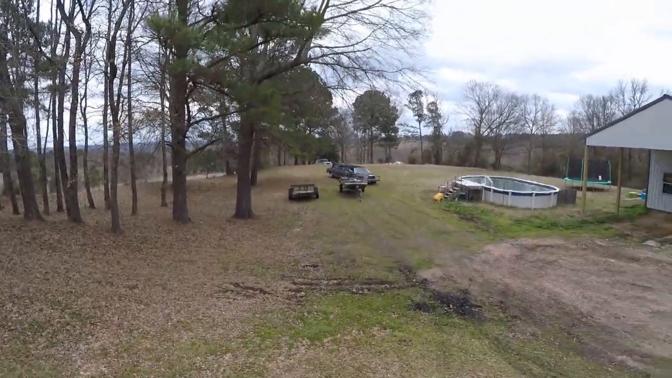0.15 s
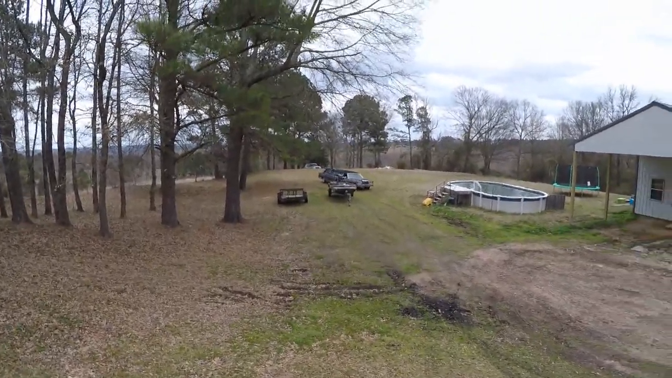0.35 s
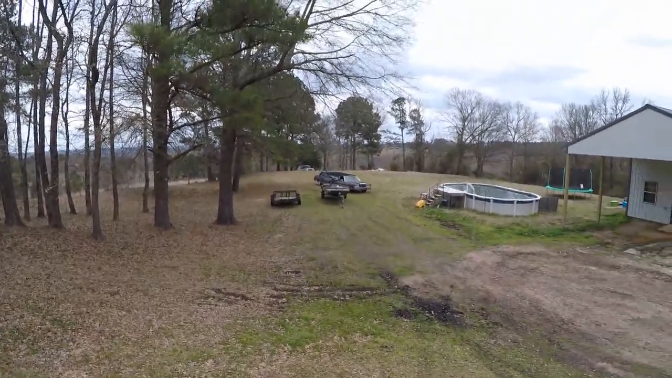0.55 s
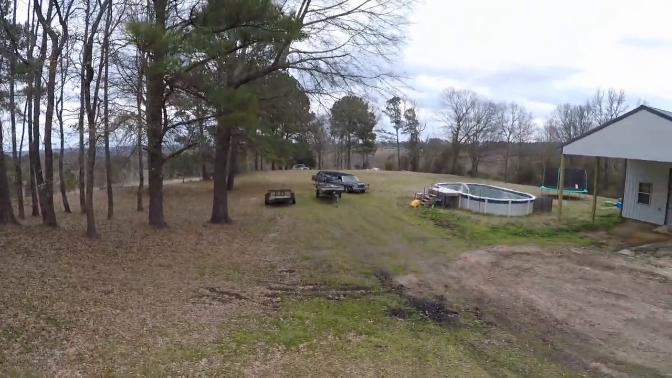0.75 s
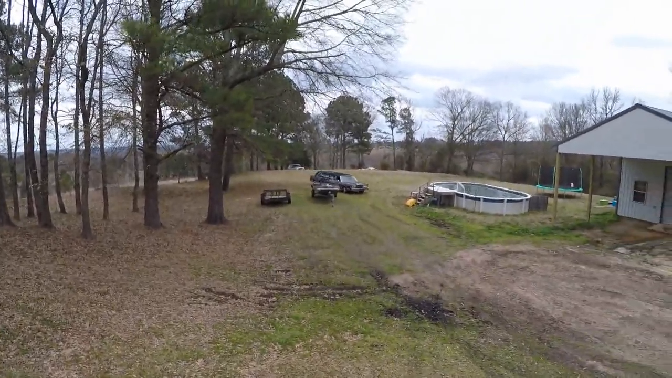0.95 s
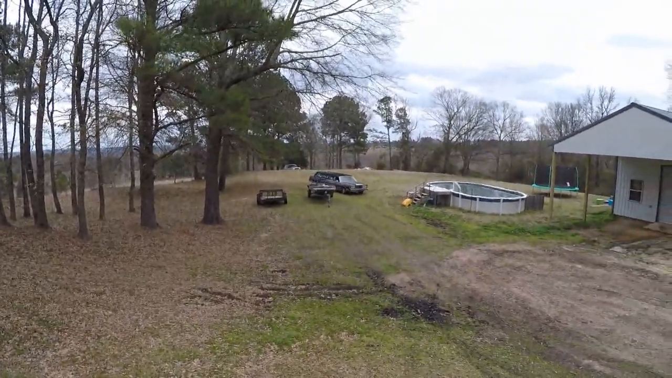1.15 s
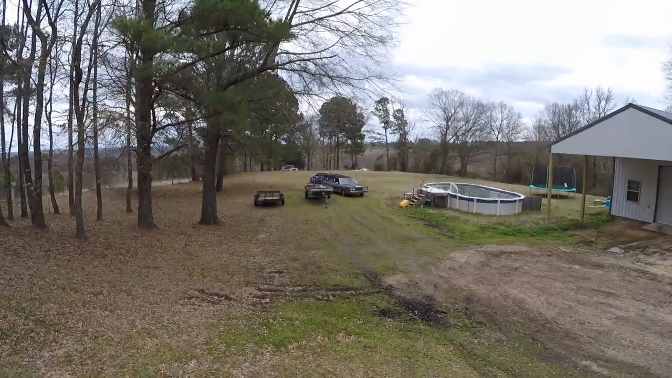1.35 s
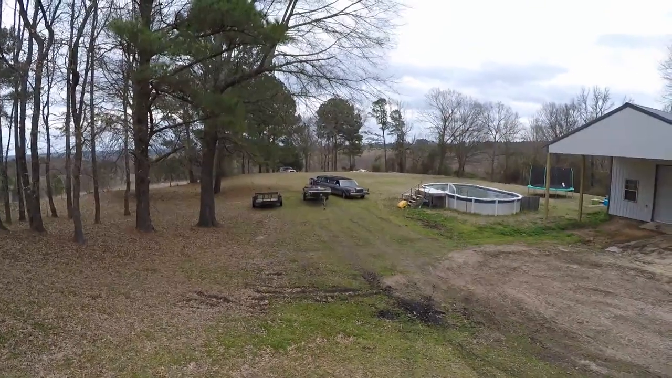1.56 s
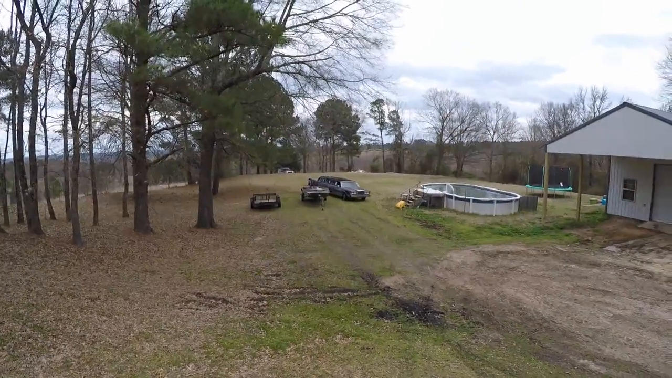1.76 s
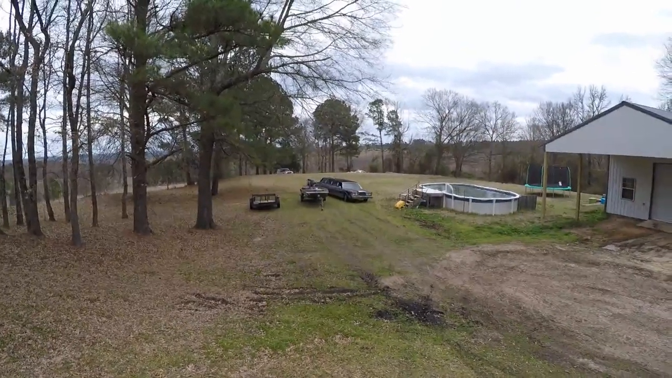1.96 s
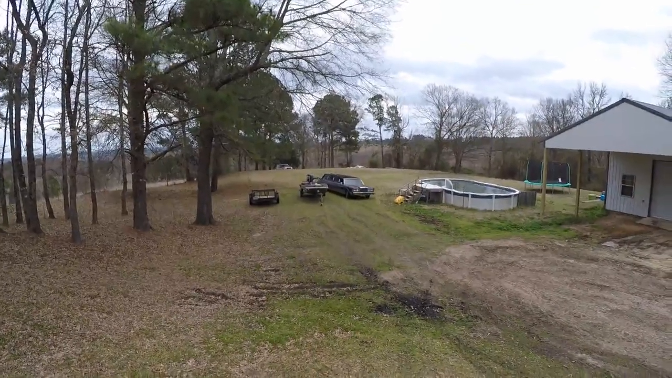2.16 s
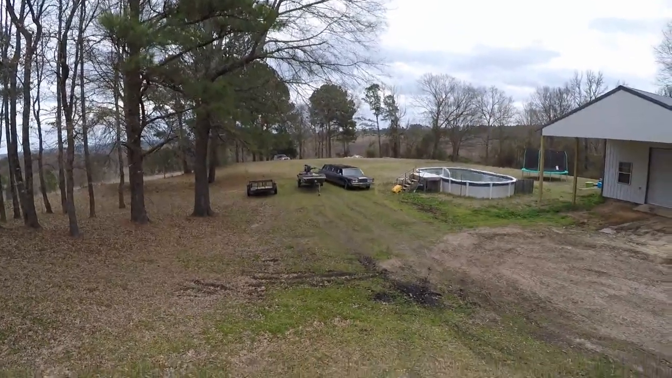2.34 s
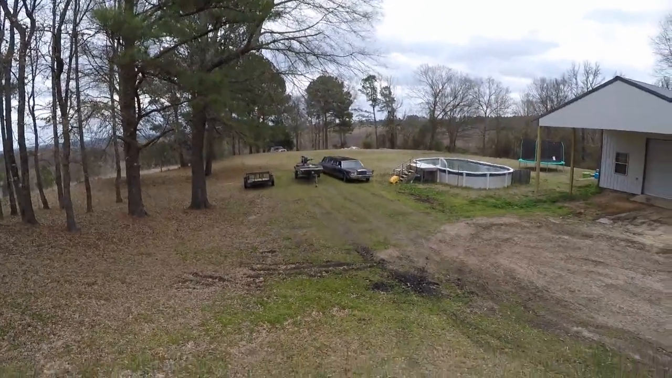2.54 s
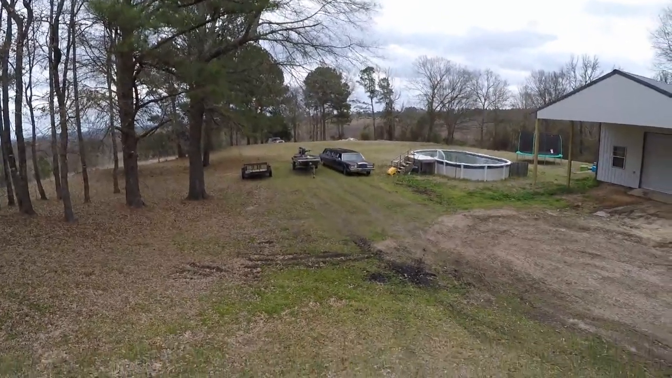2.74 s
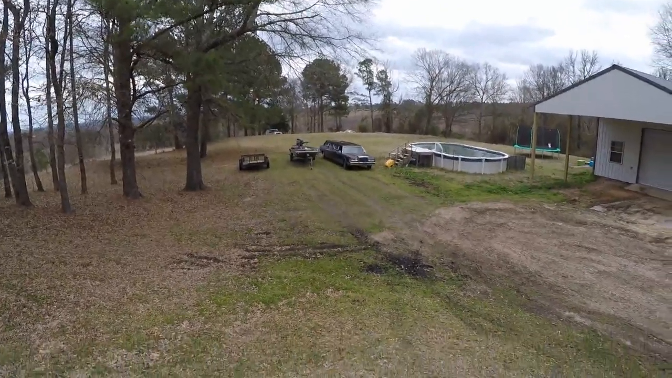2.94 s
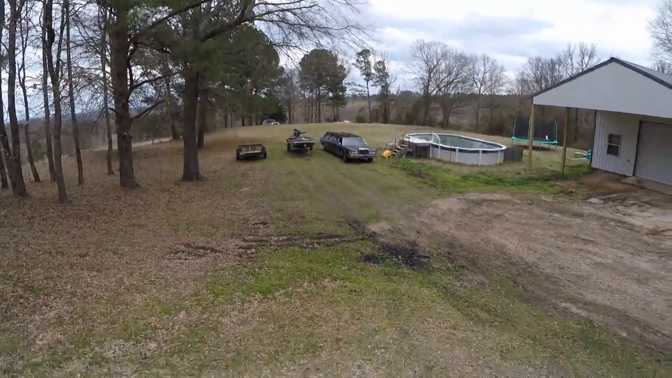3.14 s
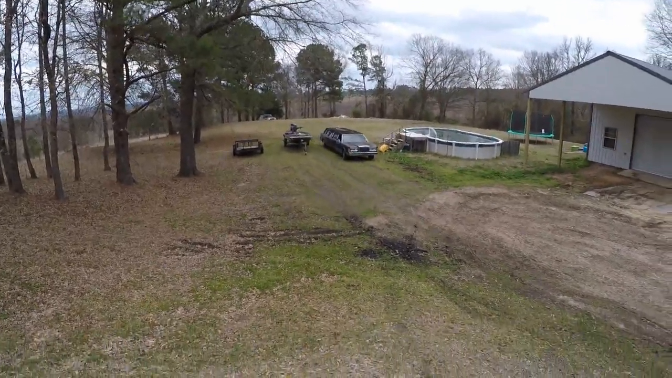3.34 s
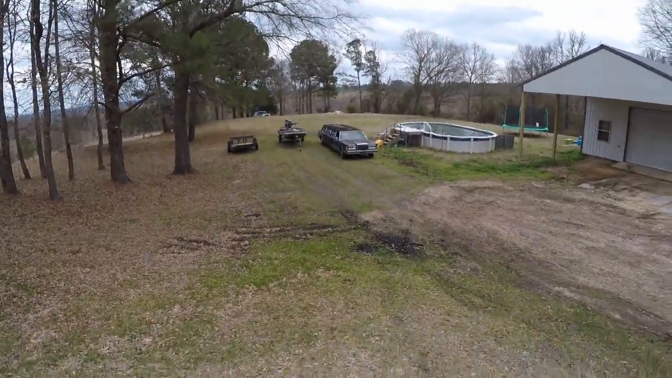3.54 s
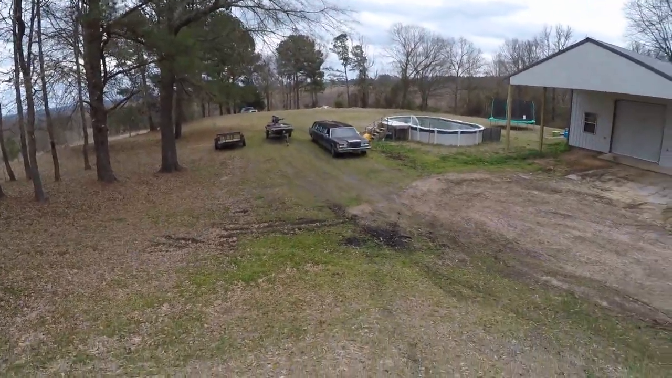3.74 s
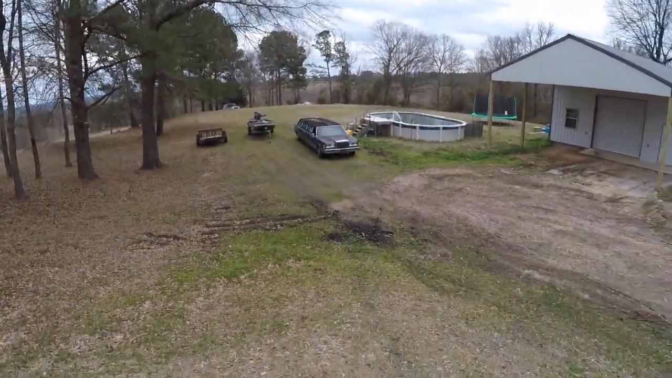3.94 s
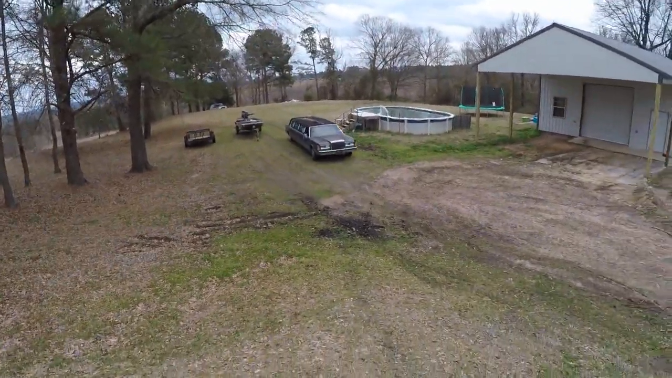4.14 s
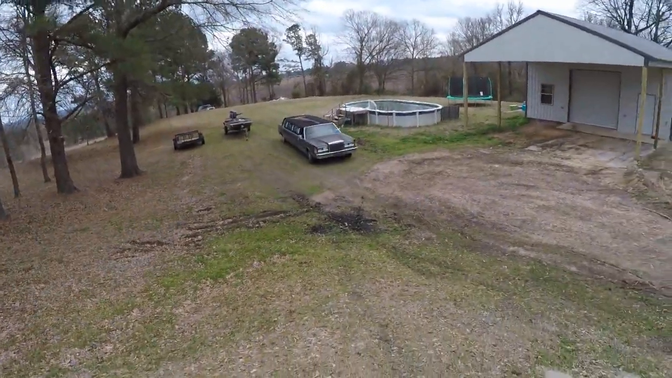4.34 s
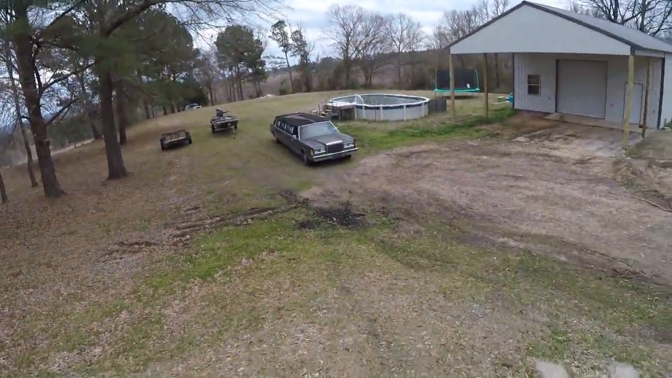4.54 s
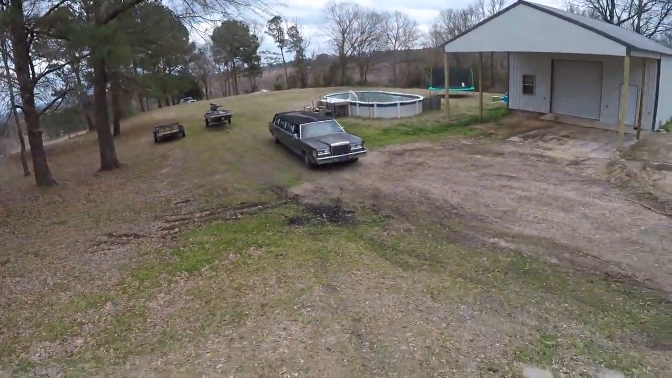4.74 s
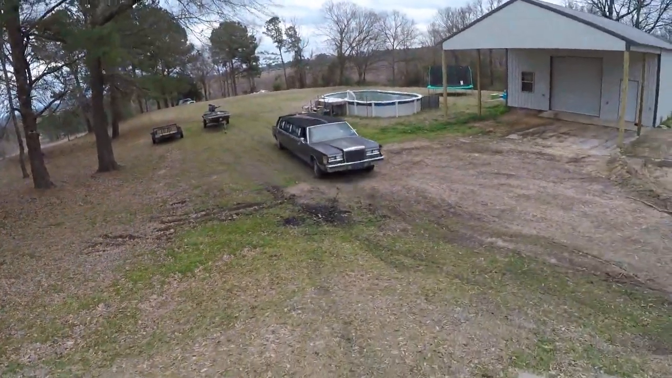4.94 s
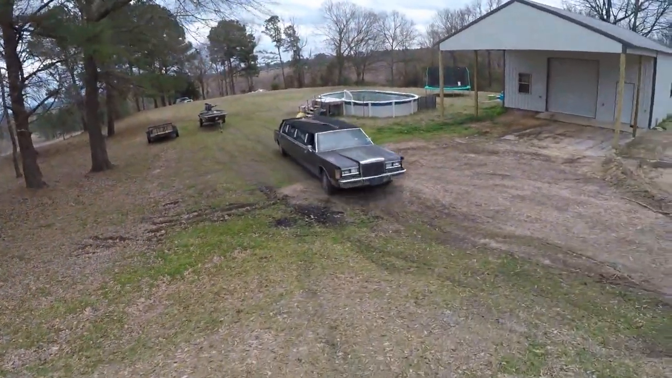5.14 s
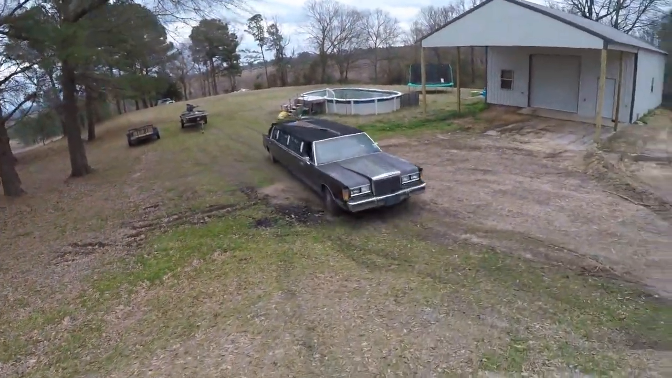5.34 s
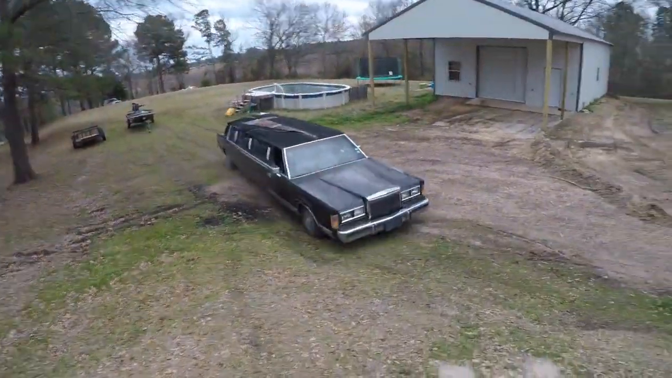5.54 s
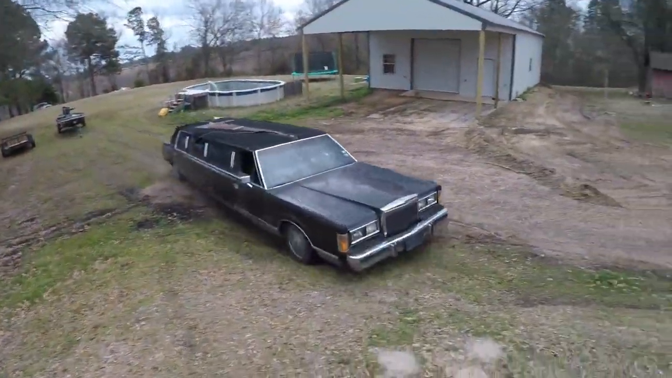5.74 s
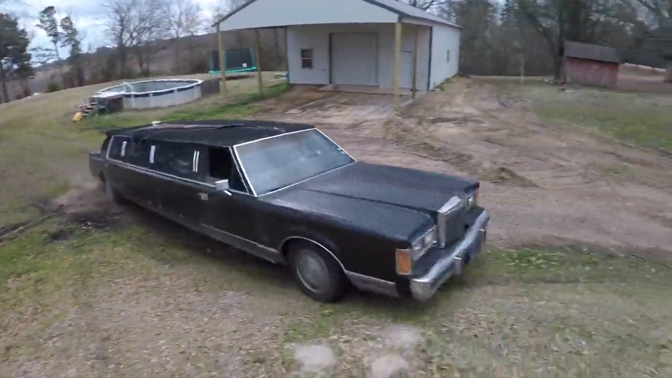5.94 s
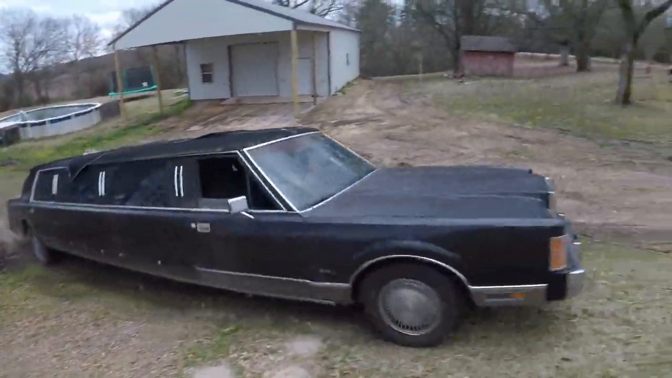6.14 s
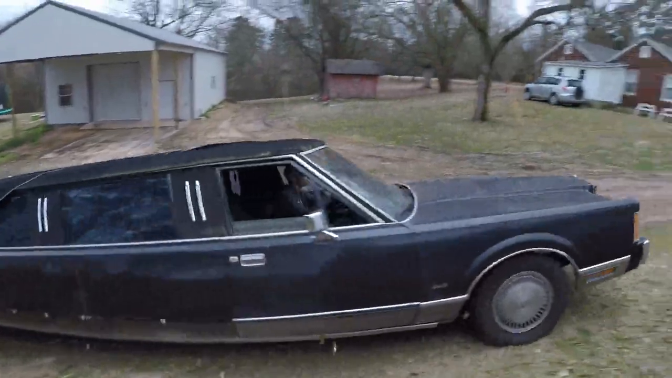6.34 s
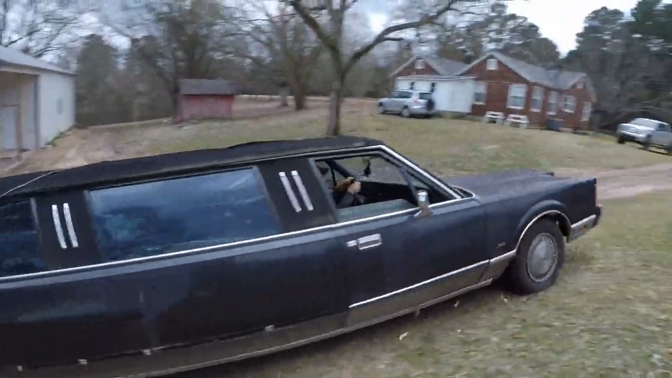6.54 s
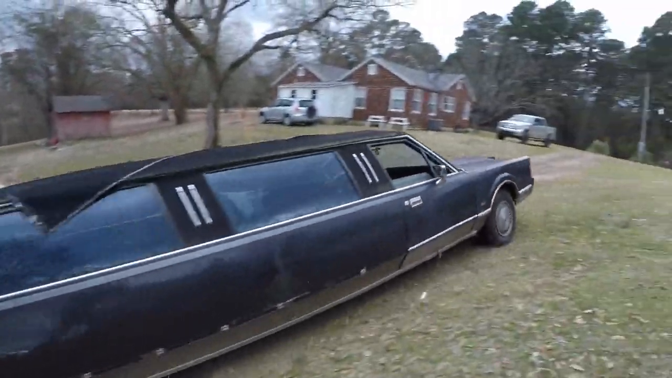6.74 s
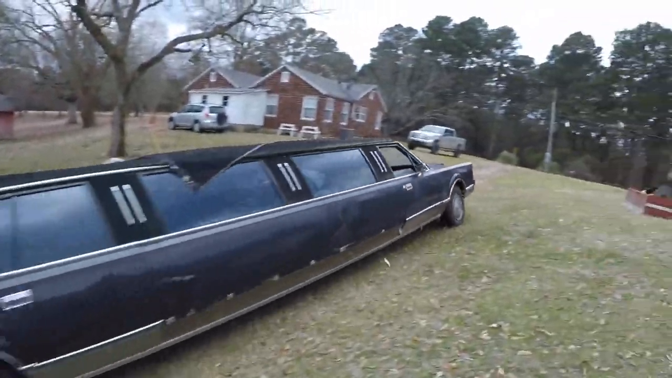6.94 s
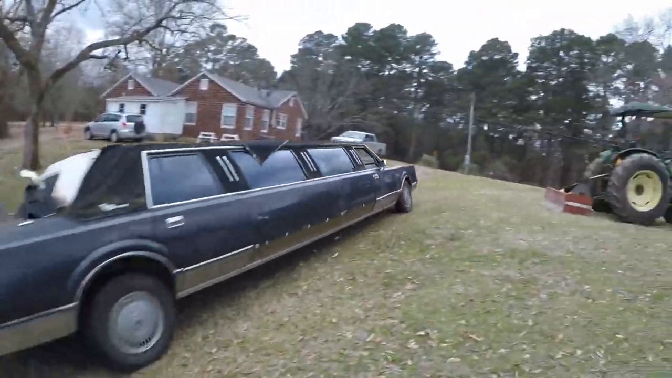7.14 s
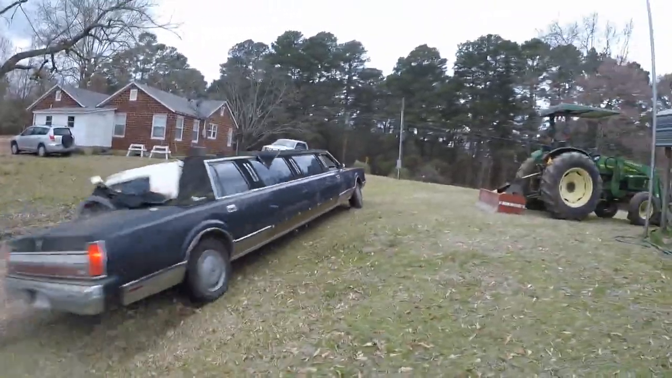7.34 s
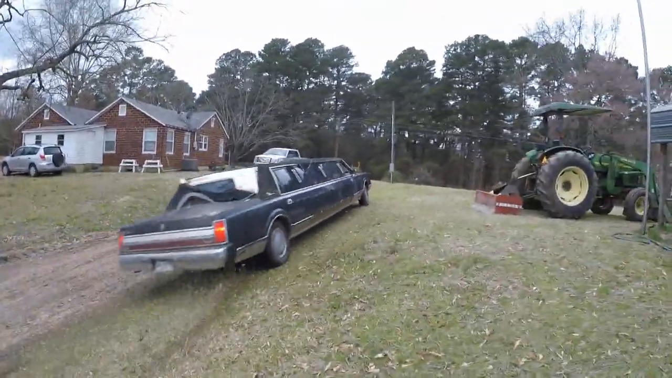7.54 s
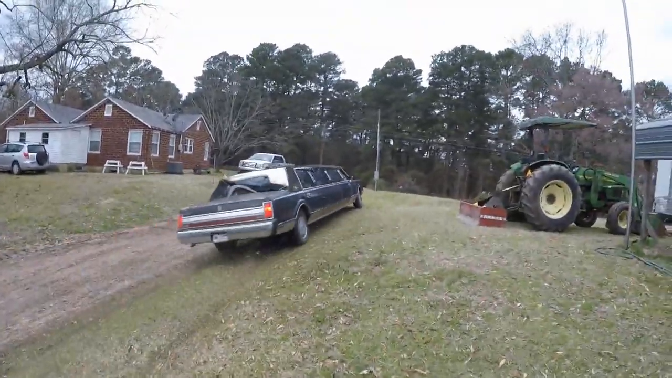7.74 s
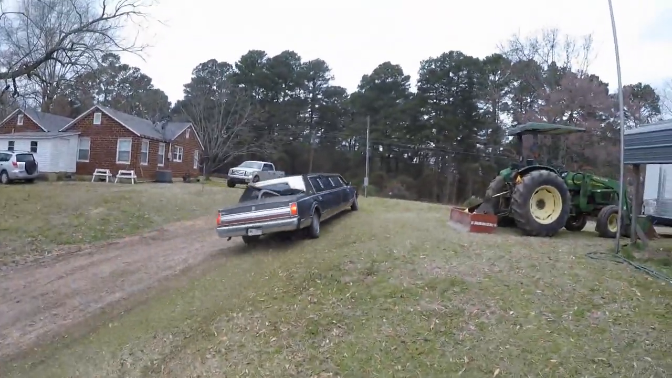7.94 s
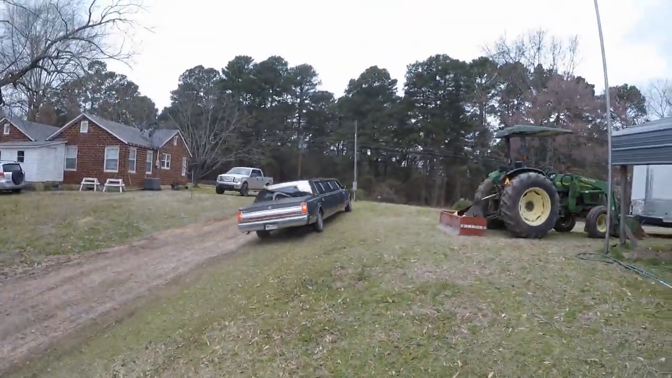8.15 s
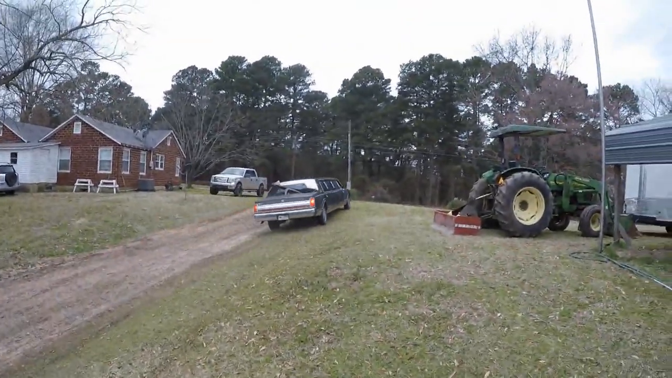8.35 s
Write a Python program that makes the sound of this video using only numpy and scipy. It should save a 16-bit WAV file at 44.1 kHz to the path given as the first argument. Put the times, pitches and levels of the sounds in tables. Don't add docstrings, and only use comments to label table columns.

```python
import sys
import numpy as np
from scipy import signal
from scipy.fft import rfft, irfft, next_fast_len
from scipy.io import wavfile
from scipy.ndimage import uniform_filter1d

SR = 44100
rng = np.random.default_rng(int(sys.argv[2]) if len(sys.argv) > 2 else 0)


def unload_audio(sound):
    columns = np.transpose(np.atleast_2d(sound))
    steps = np.round(np.clip(columns, -1, 1) * 32767)
    wavfile.write(sys.argv[1], SR, steps.astype(np.int16))


def gain_from_db(level_db):
    decades = np.asarray(level_db, float) / 20
    return 10 ** decades


N = 369999
T = np.arange(N) / SR

# time in seconds, firings per second in Hz.
FIRING_RATE = [(0.0, 48.8), (0.51, 70.16), (1.4, 89.75), (2.0, 98.8), (2.7, 116.4), (3.08, 126.7),
               (3.69, 136), (4.98, 150.5), (5.42, 154.1), (5.445, 154.8), (5.8, 164.8), (6.05, 168.2),
               (6.2, 191.4), (6.48, 190), (6.76, 216.7), (7.04, 187.4), (7.3, 191.6)]
# time in seconds, exhaust level in dB,
# lift of the firing tones over the other tones in dB, gas noise level in dB.
THROTTLE = [(0.0, -35, 2, -58.5), (0.51, -27, 1, -52.5), (1.4, -28.5, 10, -50), (2.0, -22, 8, -46),
            (2.7, -22, 3.5, -40), (3.0, -18.5, -0.5, -37.5), (3.69, -18, 5.5, -31.5),
            (4.35, -13.5, -3.5, -29.5), (4.6, -16.5, 3, -30.5), (4.98, -15, 1.5, -28.5),
            (5.42, -14.5, 4, -24.5), (5.445, -18, 2.5, -30), (5.8, -16.5, 5.5, -27), (6.05, -15, 8, -23.5),
            (6.16, -13.5, 7, -21), (6.24, -14, -3.5, -21.5), (6.48, -11.5, -3, -25.5),
            (6.65, -13, 3, -24.5), (6.8, -12.5, 1, -26), (6.9, -11, 1.5, -31), (7.04, -9.5, -3.5, -36),
            (7.3, -15, 1.5, -36.5)]
# multiple of the engine cycle rate, level in dB.
NOSE_TONES = [(1, -34), (2, -7.5), (3, -5.5), (4, -5.5), (5, 1), (6, -4), (7, -5), (8, 1.5), (9, -8.5),
              (10, -6), (11, -11.5), (12, -13), (13, -26), (14, -45), (15, -26.5), (16, -22), (17, -17.5),
              (18, -44), (19, -22.5), (20, -57), (21, -43), (22, -32), (23, -51), (24, -36)]
# multiple of the engine cycle rate, level in dB.
TAIL_TONES = [(1, -31), (2, -10.5), (3, -3), (4, 2.5), (5, -3.5), (6, -2), (7, -4.5), (8, -1), (9, -10.5),
              (10, -18.5), (11, -12), (12, -14.5), (13, -12.5), (14, -17.5), (15, -16), (16, -14.5),
              (17, -16), (18, -18), (19, -29), (20, -17.5), (21, -24), (22, -26), (23, -36), (24, -33.5),
              (25, -35.5), (26, -36)]
CYLINDER_PUFFS = [0, -8, -13, -11, -6, -12, -15, -13]
# time in seconds, length of turn in seconds,
# added share of tail pipe from 0 to 1.
TURNS = [
    (5.5, .2, .15),
    (6.15, .06, .85),
]
# time in seconds, half length in seconds,
# level in dB, pitch in Hz.
PANEL_BOOMS = [
    (5.795, 0.33, 1, 92.7),
    (5.913, 0.49, 1.5, 73),
    (6.274, 0.21, 0.5, 129.6),
    (6.36, 0.22, -1.5, 262),
    (6.457, 0.11, 0, 171.5),
    (6.712, 0.23, -3.5, 326),
    (7.177, 0.12, -5.5, 323),
    (4.58, 0.046, 3, 148),
]
# frequency in Hz, gain in dB.
MUFFLER = [(25, -10), (60, -2), (100, 0), (200, 0), (260, -2), (600, -1)]
# time in seconds, half length in seconds,
# share removed, low edge in Hz, high edge in Hz.
FLANK_SHADE = (5.91, 0.25, 1.1, 234, 300)
# frequency in Hz, level per Hz in dB.
GAS_TONE = [(300, -2), (450, 3), (700, -6.5), (1400, -5.5), (1900, -4.5), (2300, -12.5), (2900, -14.5),
            (3800, -9.5), (4700, -14), (6200, -12), (7500, -19), (8300, -25.5), (11300, -38), (13200, -51),
            (15000, -65)]
# frequency in Hz, gain against the middle in dB.
SIDE_TONE = [(300, 0), (1300, 2.5), (2100, -4), (2600, -4), (4200, -13), (5500, -6.5), (9000, -10.5),
             (12000, -1), (15000, -8)]
# time in seconds, half length in seconds, swell in dB.
LEAK_SWELL = [
    (6.2, 0.34, 4),
]
# time in seconds, half length in seconds, swell in dB.
INTAKE_SWELLS = [
    (5.2, 0.23, 16),
    (6.15, 0.099, 11),
    (6.42, 0.14, 8.5),
    (6.62, 0.26, 9),
    (6.8, 0.11, 9.5),
]
# pitch in Hz, width in Hz, level in dB.
PIPE_RINGS = [(2520, 250, -13), (3800, 390, -8.5), (6060, 600, -20)]
# time in seconds, half length in seconds,
# share removed, low edge in Hz, high edge in Hz.
LAWN_ECHO_DIP = (6.2, 0.29, 0.35, 2920, 3800)
# time in seconds, level in dB.
BREEZE = [(0, -46), (.8, -54.5), (1.2, -32.5), (2.1, -42.5), (2.5, -37.5), (3.5, -39), (4.5, -32),
          (5.5, -18.5), (5.9, -61), (6.2, -81), (7.62, -80), (7.7, -69), (8.0, -41), (8.39, -29)]
# time in seconds, half length in seconds, swell in dB.
GUSTS = [(0.0, 0.031, -4), (1.02, 0.031, 8), (1.2, 0.037, -4), (1.42, 0.023, -6), (1.57, 0.12, 10.5),
         (2.36, 0.053, 8.5), (2.58, 0.06, 13), (2.69, 0.056, 9.5), (2.9, 0.022, 8), (3.02, 0.061, 7.5),
         (3.72, 0.22, 13), (3.96, 0.024, 3), (4.09, 0.2, 9), (4.49, 0.059, 7.5), (4.84, 0.13, 7),
         (4.99, 0.012, -7), (5.13, 0.039, 6.5), (5.42, 0.014, 1.5), (8.07, 0.038, 7.5), (8.17, 0.037, 13.5),
         (8.225, 0.034, 7), (8.285, 0.032, 17)]
# frequency in Hz, level per Hz in dB.
TREE_TONE = [(240, -34), (400, -11), (701, -9.5), (1160, -5.5), (1940, -11.5), (2320, -16), (4130, -13),
             (4810, -19.5), (6510, -12), (13300, -31), (15000, -71)]
# time in seconds, half length in seconds, change in dB.
TREES_BEHIND = [
    (7.8, 0.27, -4),
]
# start in seconds, peak in dB, ring in Hz, sizzle in dB.
TICKS = [(0.03, -37.5, 8000, -69), (0.07, -36, 8600, -70), (0.1093, -37, 8000, -63),
         (0.2795, -40, 7500, -64), (4.4986, -28, 3600, -54), (5.136, -16, 4196, -44),
         (5.1785, -14.5, 3780, -65), (5.2568, -17, 5850, -47), (5.31, -27, 8800, -47.5),
         (5.39, -24.5, 8450, -46), (7.317, -22, 4300, -45), (7.553, -29.5, 4309, -56),
         (7.656, -29, 5450, -43), (7.693, -36, 4110, -53), (7.9203, -36, 3800, -62),
         (7.976, -29, 4050, -67), (8.06, -29, 3500, -62), (8.129, -34, 5780, -58), (8.375, -28, 3900, -50)]
# start in seconds, peak in dB, ring in Hz, body in dB, thump in dB.
KNOCKS = [(1.541, -36, 900, -28, -34), (1.557, -40, 800, -27, -37), (1.572, -38, 900, -31, -33),
          (1.587, -41, 900, -28, -34), (2.3206, -14, 2010, -17, -7.5), (2.332, -12.5, 2000, -23, -41),
          (2.577, -42, 1430, -47, -25), (2.7246, -16.5, 1760, -28, -35), (2.898, -16, 2070, -21, -25),
          (3.738, -14, 2120, -18, -31), (3.756, -12, 2550, -26, -21), (3.762, -12, 1700, -32, -30),
          (7.976, -30, 2400, -37, -29), (8.084, -35, 1000, -20, -19), (8.163, -31, 1500, -12.5, -17.5),
          (8.174, -32, 1900, -26, -31), (8.194, -34, 1500, -23.5, -18), (8.211, -40.5, 900, -30, -15),
          (8.234, -33, 1400, -17, -19), (8.256, -38, 1000, -25, -15), (8.271, -36, 1200, -28, -15.5),
          (8.282, -21, 2470, -16, -26), (8.287, -11.5, 1500, -19, -25), (8.2921, -25, 2630, -10, -17),
          (8.303, -22, 1890, -15, -31), (8.3612, -36, 1070, -18.5, -16.5), (8.379, -28, 1500, -20, -18.5)]
# time in seconds, width from 0 to 1.
WIDTH = [
    (0, 1),
    (5.5, 0.59),
    (6.15, 0.03),
    (6.25, 0.02),
    (7.63, 0),
    (7.68, 0.24),
    (8.2, 0.67),
    (8.39, 0.5),
]
# frequency in Hz, gain in dB.
MONO_PORT_TONE = [(200, 1.5), (2500, 1.5), (7000, -4.5), (8500, -3.5), (11300, -2), (12800, 4.5),
                  (15000, -8)]
# time in seconds, half length in seconds,
# share removed, low edge in Hz, high edge in Hz.
PORT_CANCEL = [
    (5.8, 0.089, 0.84, 8000, 10700),
    (5.986, 0.1, .9, 7370, 9060),
    (6.0, 0.16, 0.6, 10900, 12100),
    (6.05, 0.2, 0.3, 12200, 14800),
    (6.75, 0.77, 0.74, 10160, 11900),
]

CYLINDERS = 8
LIFT_S, SAG_HZ_PER_S, IDLE_HZ, SHUT_S = 7.35, 260, 82.5, 0.17
SHUT_EXHAUST_DB, SHUT_GAS_DB, SHUT_FIRING_DB, IDLE_FIRING_DB = -20, -10, 14.5, -14
SHUT_RUMBLE_DB, SHUT_BURBLE_DB, SHUT_HISS_DB = 19.5, 5, -5
HISS_SHUTS_S, FADE_DB_PER_S = 7.31, -19.5
FIRING_WAVER = 0.4
PIPE_LAG = 0.12
FLANK_SCATTER, TAIL_SCATTER, TAIL_CLEAR_S = 1.1, 0.3, 6.7
BURBLE_DB, BURBLE_DB_PER_S, TAIL_BURBLE_DB = -37.5, 3, -3
BARK_DB, BARK_HZ, BARK_WIDTH_HZ = -15, 410, 190
BARK_FROM_S, BARK_GROWS_S, BARK_ENDS_S = 6.8, 0.2, 7.25
PUFF_FAR, PUFF_TAIL = 0.25, 0.57
PUFF_RISE_S, PUFF_FALL_S, PUFF_LAG_S = 0.0045, 0.0045, 0.0005
PUFF_LOW = 0.6
HISS_DB, TAIL_HISS_DB, TAIL_RING_DB = -4, 2.5, 10
TAIL_RING_SHARP = 1.9
INTAKE_HZ, INTAKE_SLIDE_HZ, INTAKE_SLIDE_S, INTAKE_DB = 1476, 331.4, 5.42, -17.5
INTAKE_WANDER = 0.06
SQUEAL_HZ, SQUEAL_S, SQUEAL_HALF_S, SQUEAL_DB = 1430, 5.17, 0.13, -34
WIND_RUMBLE_DB, RUMBLE_FOLLOWS = -14.5, 0.43
TREES_DB = -50.5
TICK_T60_S = 0.12
RAP_S, BODY_S, KNOCK_PAN_DB = 0.0084, 0.013, 0.5
SHELL_HZ, SHELL_DB, SHELL_S = 187, 1, 0.0066
CANCEL_TO_SIDE_DB = -3.5


def unit(x):
    return x / np.sqrt(np.mean(x ** 2))


def curves(table):
    s, *columns = np.transpose(table)
    return [np.interp(T, s, c) for c in columns]


def ramp(s, length):
    return np.clip((T - s) / length, 0, 1)


def bell(s, half):
    return np.exp(-((T - s) / half) ** 2)


def swells(table):
    return sum(db * bell(s, half) for s, half, db in table)


def white(*shape):
    return rng.standard_normal(shape)


def colour(x, table):
    hz, db = np.transpose(table)
    size = next_fast_len(N)
    bins = np.log(np.arange(size // 2 + 1) * SR / size + 1)
    gain = gain_from_db(np.interp(bins, np.log(hz), db))
    return irfft(rfft(x, size) * gain, size)[..., :N]


def band(x, lo_hz, hi_hz, order=2):
    return signal.sosfilt(signal.butter(order, [lo_hz, hi_hz], "band", fs=SR, output="sos"), x)


def hollow(x, s, half, share, lo_hz, hi_hz):
    sos = signal.butter(2, [lo_hz, hi_hz], "band", fs=SR, output="sos")
    removed = np.clip(share, 0, 1) * np.exp(-((T - s) / half) ** 4)
    return x - removed * signal.sosfiltfilt(sos, x)


def walk(rate):
    step = 64
    k = max(int(SR / step / rate), 2)
    slow = uniform_filter1d(uniform_filter1d(white(N // step + 2), k), k)
    return np.interp(T, np.arange(len(slow)) * step / SR, unit(slow))


def blow_phases(db):
    log_gain = np.log(gain_from_db(np.concatenate([[db[0] - 15.0], db, [db[-1] - 0.5]])))
    cepstrum = irfft(log_gain)
    half = len(cepstrum) // 2
    cepstrum[1:half] *= 2
    cepstrum[half + 1:] = 0
    return rfft(cepstrum).imag[1:-1]


def exhaust_tones(table, cycle, firing_db, scatter, wander_db, drift, rate):
    multiple, db = np.transpose(table)
    phases = blow_phases(db) / 2
    out = 0
    for k, level_db, blow, chance in zip(multiple, db, phases, white(len(db))):
        fires = k % CYLINDERS == 0
        waver = np.sqrt(k / CYLINDERS) * (FIRING_WAVER if fires else 1)
        level = gain_from_db(level_db + firing_db * fires + wander_db * waver * walk(rate))
        phase = blow + scatter * chance + drift * waver * walk(rate)
        out = out + level * np.cos(2 * np.pi * k * cycle + phase)
    return out / np.sqrt(np.sum(gain_from_db(2 * db)) / 2)


def gas_puffs(cycle):
    firing = (CYLINDERS * cycle).astype(int)
    chance_db = white(N // 150)[firing]
    size = gain_from_db(np.array(CYLINDER_PUFFS)[firing % CYLINDERS] + chance_db)
    puffs = np.roll(size * np.diff(firing, prepend=firing[0]), int(PUFF_LAG_S * SR))
    for lag_s in (PUFF_RISE_S, PUFF_FALL_S):
        puffs = signal.lfilter([1], [1, -np.exp(-1 / (lag_s * SR))], puffs)
    puffs /= uniform_filter1d(puffs, SR // 4) + 1e-9
    turn = firing // CYLINDERS
    return puffs, size * np.diff(turn, prepend=turn[0])


def exhaust(cycle, note_db, firing_db, tail, shut, gate, first):
    scatter = FLANK_SCATTER + (TAIL_SCATTER - FLANK_SCATTER) * ramp(TAIL_CLEAR_S, 0.25)
    nose = exhaust_tones(NOSE_TONES, cycle, firing_db, scatter=3.0, wander_db=2.7, drift=0.55, rate=9)
    pipe = exhaust_tones(TAIL_TONES, cycle - PIPE_LAG, firing_db, scatter, wander_db=2.6, drift=0.45, rate=14)
    tone = np.sqrt(1 - tail) * nose + np.sqrt(tail) * pipe
    booms = sum(gain_from_db(db) * bell(s, half) * band(tone, hz * 0.827, hz * 1.193)
                for s, half, db, hz in PANEL_BOOMS)
    rumble = gain_from_db(-16.5 + tail + SHUT_RUMBLE_DB * shut) * unit(band(white(N), 70, 230))
    burble_db = BURBLE_DB + BURBLE_DB_PER_S * T + SHUT_BURBLE_DB * shut
    burble_db = burble_db + TAIL_BURBLE_DB * tail * (1 - shut)
    burble = gate * gain_from_db(burble_db) * unit(band(white(N), 224, 500))
    bark = unit(band(np.roll(first, shift=200), BARK_HZ - BARK_WIDTH_HZ, BARK_HZ + BARK_WIDTH_HZ))
    bark_fade = ramp(BARK_FROM_S, BARK_GROWS_S) * (1 - ramp(BARK_ENDS_S, BARK_GROWS_S / 2))
    note = gain_from_db(note_db) * (tone + booms + rumble + burble + gain_from_db(BARK_DB) * bark * bark_fade)
    return hollow(colour(note, MUFFLER), *FLANK_SHADE)


def intake_ring(tail, gate):
    hz = INTAKE_HZ + INTAKE_SLIDE_HZ * ramp(INTAKE_SLIDE_S, 0.15)
    hz = hz * (1 + INTAKE_WANDER * np.sqrt(tail) * walk(13))
    slide = np.cos(2 * np.pi * np.cumsum(hz) / SR)
    level = gain_from_db(INTAKE_DB + swells(INTAKE_SWELLS) + 1.5 * tail * walk(25))
    rush = unit(colour(white(2, N), [(150, 10), (450, -14), (900, -50)]))
    return level * gate ** 1.5 * slide * rush


def pipe_rings(puffs, depth):
    out = 0
    pulse = puffs ** TAIL_RING_SHARP * depth * (1 - ramp(HISS_SHUTS_S, 0.026))
    for hz, width, db in PIPE_RINGS:
        level = gain_from_db(db + 0.83 * walk(7.8) + TAIL_RING_DB * ramp(BARK_FROM_S, 0.22))
        out = out + level * pulse * unit(band(white(2, N), hz - width / 2, hz + width / 2, order=1))
    return out


def belt_squeal(puffs):
    sing = np.cos(2 * np.pi * np.cumsum(SQUEAL_HZ * (1 + 0.018 * walk(40))) / SR)
    return gain_from_db(SQUEAL_DB + 5.0 * walk(50)) * bell(SQUEAL_S, SQUEAL_HALF_S) * sing * puffs


def leaking_gas(roar_db, tail, off, puffs, depth, gate):
    raw = white(2, N)
    dull = band(raw, 100, 1500)
    gas = colour(gate * (raw - dull) + (1 - PUFF_LOW + PUFF_LOW * gate) * dull, GAS_TONE)
    low = colour(gas, [(2100, 0), (2900, -30)])
    high = gas - low
    low = low / low[0].std() + intake_ring(tail, gate)
    high = high / high[0].std() + pipe_rings(puffs, depth)
    hiss_db = roar_db + HISS_DB + swells(LEAK_SWELL)
    hiss_db = hiss_db + TAIL_HISS_DB * ramp(BARK_FROM_S, 0.6) + SHUT_HISS_DB * ramp(HISS_SHUTS_S, 0.029)
    noise = low * gain_from_db(roar_db + FADE_DB_PER_S * off) + high * gain_from_db(hiss_db)
    noise[0] += belt_squeal(puffs)
    noise = hollow(noise, *LAWN_ECHO_DIP)
    noise[1] = colour(noise[1] + 0.05 * noise[0], SIDE_TONE)
    return noise


def car():
    hz = curves(FIRING_RATE)[0]
    note_db, firing_db, roar_db = curves(THROTTLE)
    off = np.maximum(T - LIFT_S, 0)
    shut = 1 - np.exp(-off / SHUT_S)
    hz = np.where(off > 0, np.maximum(hz - SAG_HZ_PER_S * off, IDLE_HZ), hz)
    note_db = note_db + SHUT_EXHAUST_DB * shut
    roar_db = roar_db + SHUT_GAS_DB * shut
    firing_db = firing_db + (SHUT_FIRING_DB + 2.1 * walk(13)) * shut
    firing_db = firing_db + IDLE_FIRING_DB * ramp(LIFT_S + 0.41, 0.24)
    tail = np.clip(sum(share * ramp(s, length) for s, length, share in TURNS), 0, 1)
    cycle = np.cumsum(hz) / SR / CYLINDERS + 0.86
    puffs, first = gas_puffs(cycle)
    depth = (PUFF_FAR + PUFF_TAIL * np.sqrt(tail)) * (1 - shut)
    gate = (1 - depth + depth * puffs) * gain_from_db(0.69 * walk(6.3))
    note = exhaust(cycle, note_db, firing_db, tail, shut, gate, first)
    gas = leaking_gas(roar_db, tail, off, puffs, depth, gate)
    return gas + note * np.array([[1], [gain_from_db(-21)]])


def wind():
    flutter_db = curves(BREEZE)[0] + swells(GUSTS)
    rumble_db = WIND_RUMBLE_DB + RUMBLE_FOLLOWS * flutter_db + np.minimum(flutter_db + 63.5, 0)
    rumble = unit(band(white(2, N), 66.3, 146) * gain_from_db(2 * np.array([walk(28), walk(12)])))
    eddies = white(2, N) * gain_from_db(7 * np.tanh(0.6 * np.array([walk(45), walk(45)])))
    flutter = unit(colour(eddies, [(40, -15.0), (150, 9.0), (450, 3.0), (900, -27.5), (1800, -45), (4000, -69)]))
    edge = unit(colour(eddies, [(300, 13.0), (800, 20.5), (1400, 4.5), (2200, -35), (4000, -41)]))
    flutter *= gain_from_db(np.array([[-2.0], [1.0]]))
    edge *= gain_from_db(np.array([[-4.0], [1.0]]))
    rumble *= gain_from_db(np.array([[3.0], [-1.0]]))
    return gain_from_db(rumble_db) * rumble + gain_from_db(flutter_db - 2.5) * flutter + gain_from_db(1.79 * flutter_db + 4.0) * edge


def yard():
    trees = unit(colour(white(2, N), TREE_TONE))
    trees = trees * gain_from_db(TREES_DB + swells(TREES_BEHIND) + 0.5 * walk(1.4))
    trees[1] = colour(trees[1], SIDE_TONE)
    air = unit(band(white(N), 8.5, 60)) * gain_from_db(-32.5 + 0.67 * walk(15))
    return trees + air * np.array([[1], [0.1]])


def ticks():
    out, t = np.zeros((2, N + SR)), T[:SR // 5]
    fade = np.exp(-np.log(1000) * t / TICK_T60_S)
    for s, db, hz, sizzle_db in TICKS:
        noise = white(len(t))
        ring = 1.06 * unit(band(noise, hz * 0.93, hz * 1.12))
        speck = gain_from_db(db - 18.0) * (ring + 1.94 * unit(band(noise, 2800, 7300)))
        speck += gain_from_db(sizzle_db - 6.0) * unit(band(noise, 13000, 15000))
        i = int(s * SR)
        out[:, i:i + len(t)] += speck * fade * np.array([[1], [0.25]])
    return out[:, :N]


def knocks():
    out, t = np.zeros((2, N + SR)), T[:SR // 5]
    left, right = gain_from_db(KNOCK_PAN_DB / 2), -0.3 * gain_from_db(-KNOCK_PAN_DB / 2)
    for s, db, hz, body_db, thump_db in KNOCKS:
        noise = white(len(t))
        rap = gain_from_db(db - 11.5) * unit(band(noise, hz * 0.7, hz * 0.93)) * np.exp(-t / RAP_S)
        rap += gain_from_db(body_db - 4.5) * unit(band(noise, 268, 584)) * np.exp(-t / BODY_S)
        rap *= np.minimum(t / 0.0018, 1)
        thump = gain_from_db(thump_db) * np.sin(2 * np.pi * 38 * t) * np.exp(-(t / 0.042) ** 2)
        thump += gain_from_db(thump_db + SHELL_DB) * np.sin(2 * np.pi * SHELL_HZ * t) * np.exp(-t / SHELL_S)
        i = int(s * SR)
        out[0, i:i + len(t)] += rap * (left + right) + thump
        out[1, i:i + len(t)] += rap * (left - right) / 2 + 0.2 * thump
    return out[:, :N]


def scene():
    width = np.clip(curves(WIDTH)[0], 0, 1)
    mid, side = car() + yard() + ticks() + knocks()
    gust_mid, gust_side = wind()
    side = width * (side + 0.026 * mid) + gust_side
    mid = width * mid + (1 - width) * colour(mid, MONO_PORT_TONE) + gust_mid
    side = side - 0.4 * width * band(mid, 700, 1500, order=1)
    for row in PORT_CANCEL:
        thin = hollow(mid, *row)
        side = side + gain_from_db(CANCEL_TO_SIDE_DB + 5.0 * walk(20)) * (mid - thin)
        mid = thin
    return np.array([mid + side, mid - side])


def roll_off(x):
    return signal.sosfilt(signal.butter(12, 15140, fs=SR, output="sos"), x)


def record(dry):
    limited = 0.98 * np.tanh(1.08 * dry)
    return roll_off(limited)


dry = scene()
out = record(dry)
unload_audio(out)
```